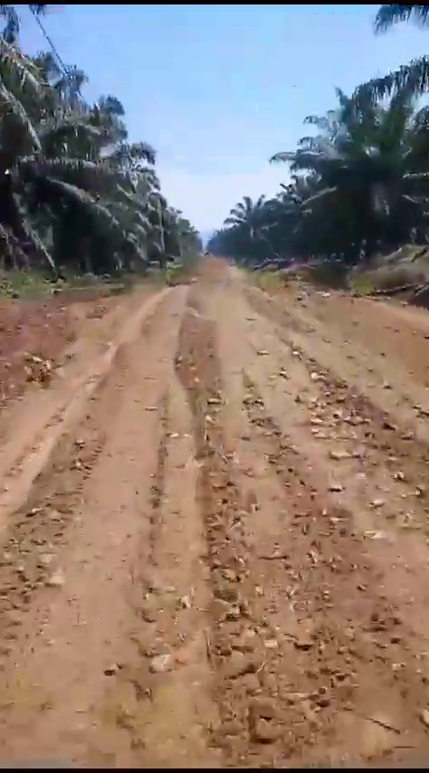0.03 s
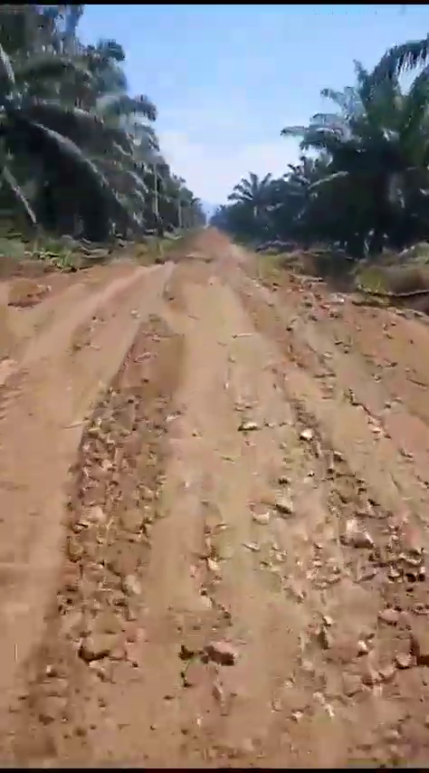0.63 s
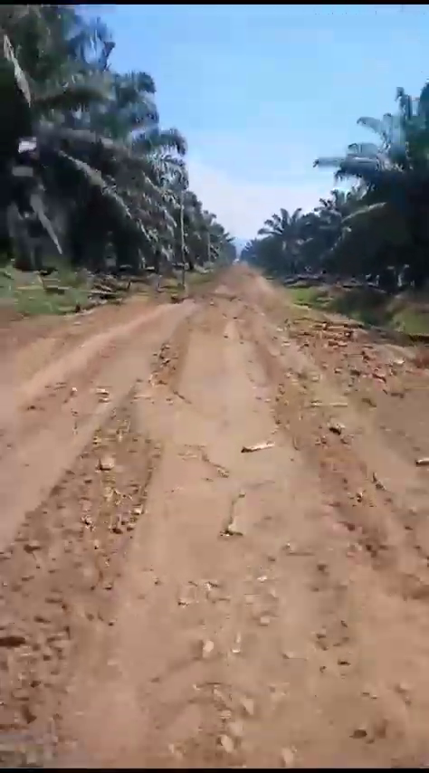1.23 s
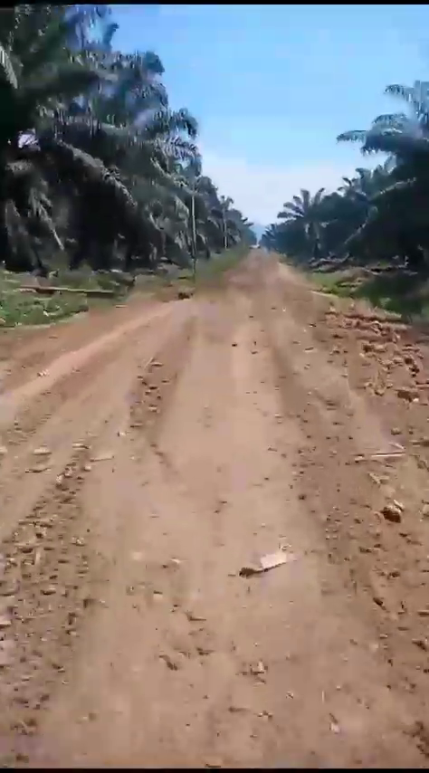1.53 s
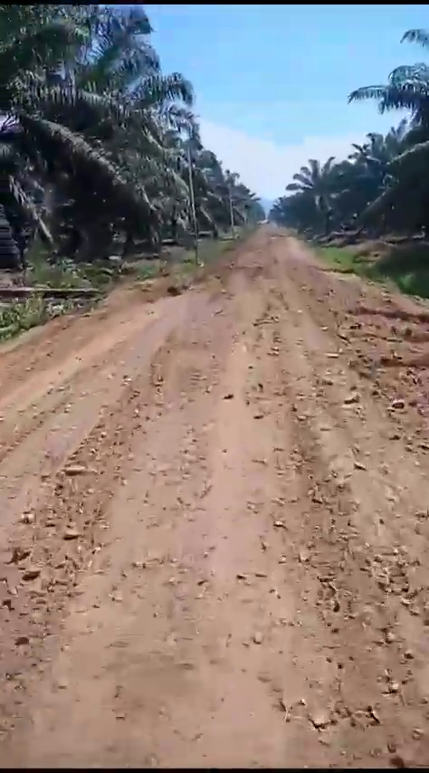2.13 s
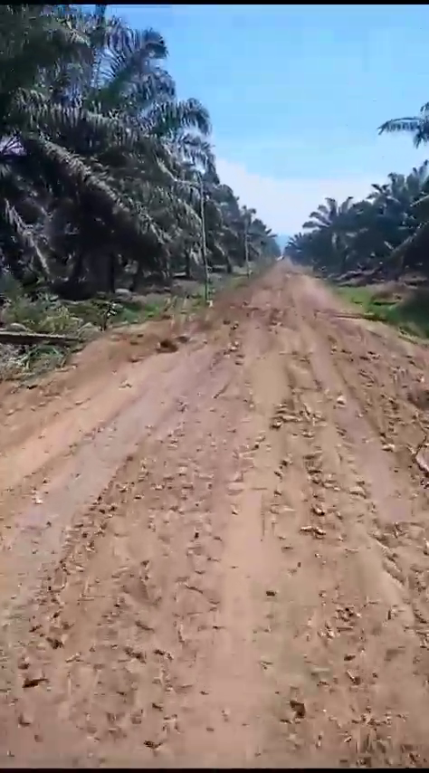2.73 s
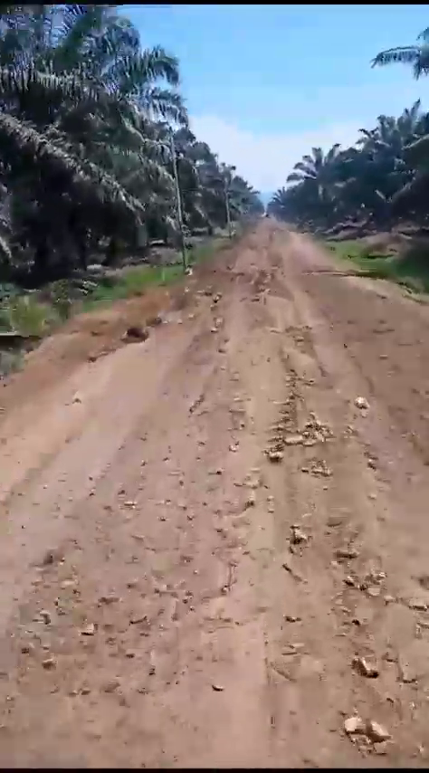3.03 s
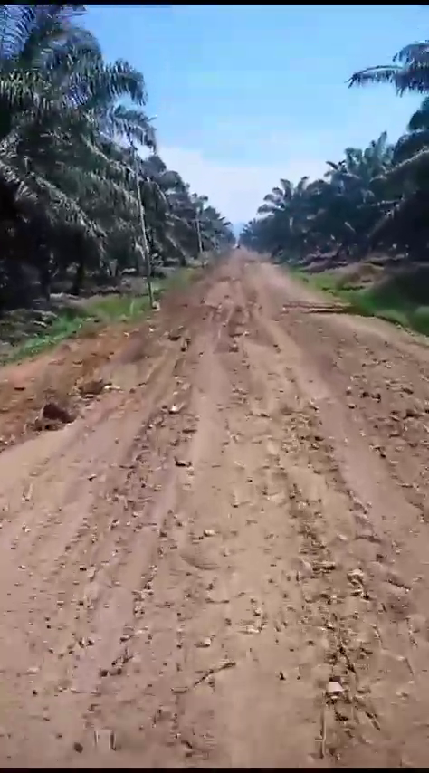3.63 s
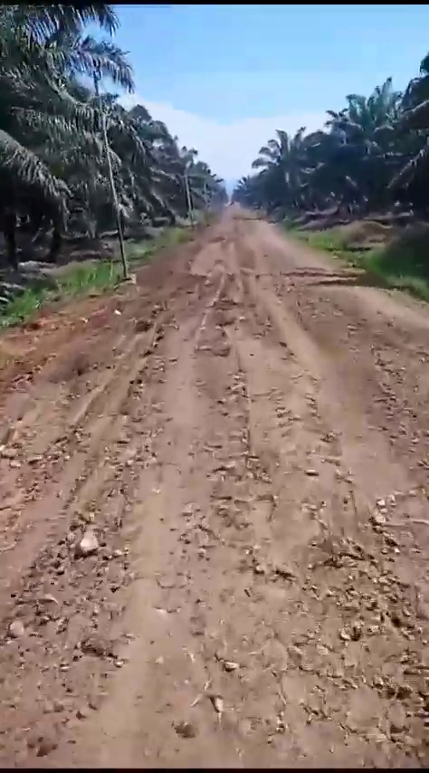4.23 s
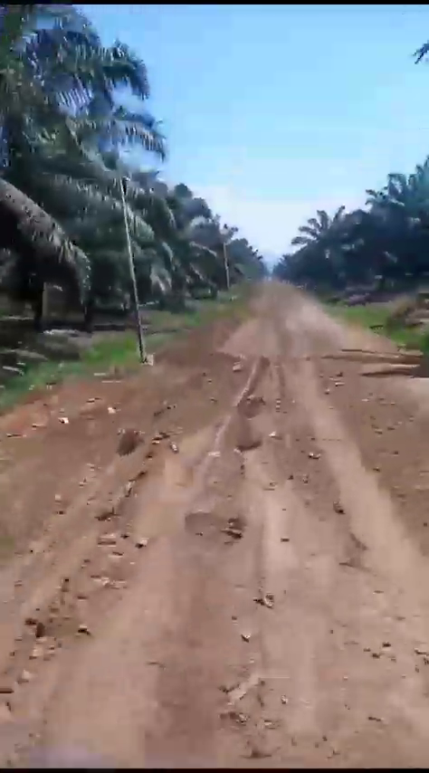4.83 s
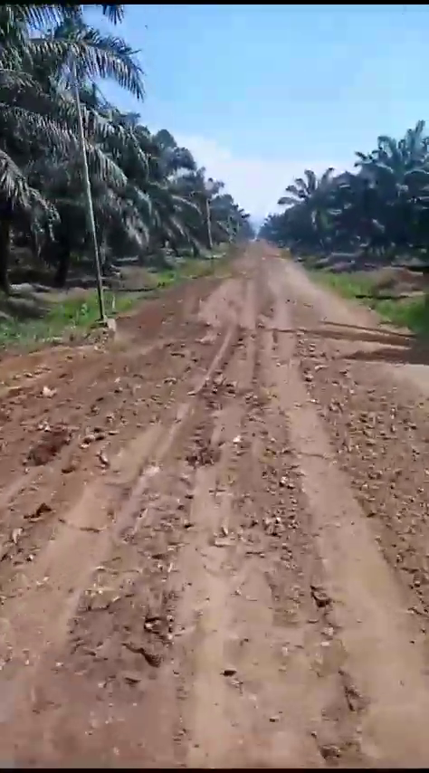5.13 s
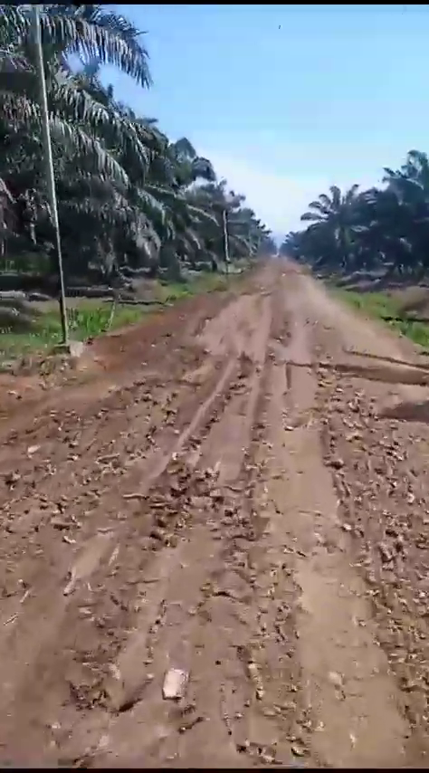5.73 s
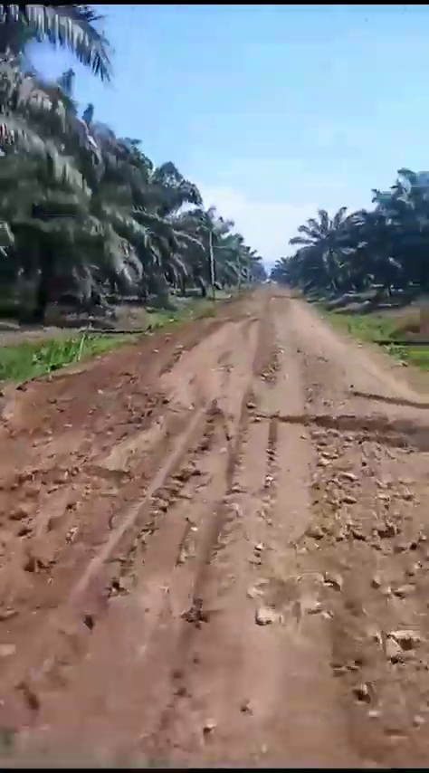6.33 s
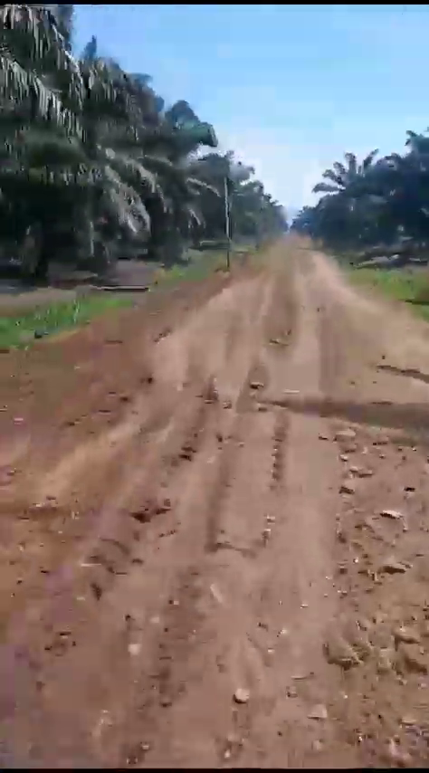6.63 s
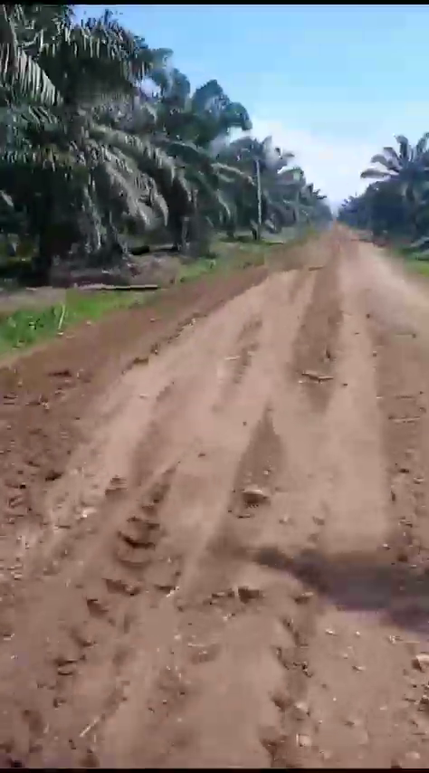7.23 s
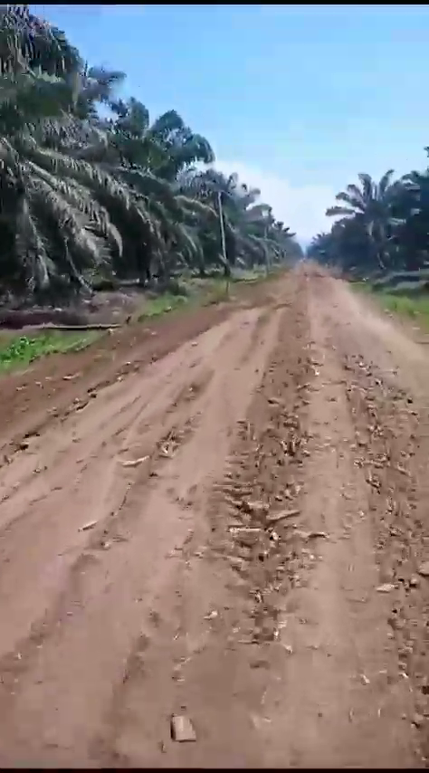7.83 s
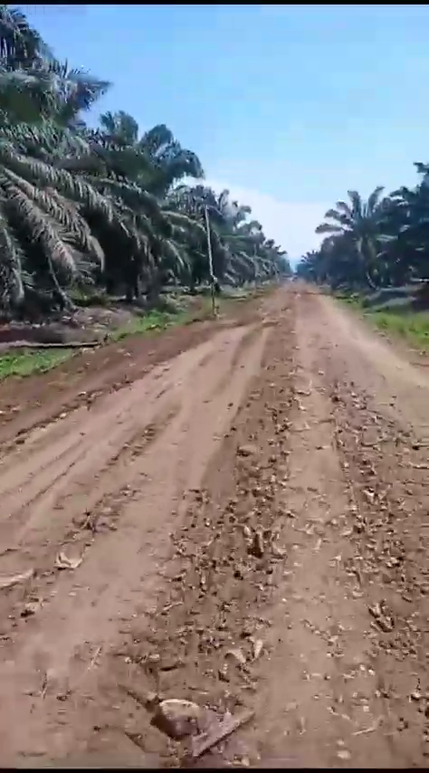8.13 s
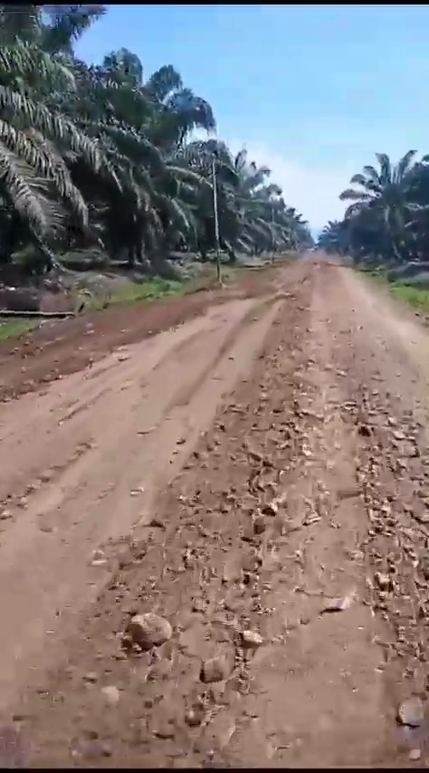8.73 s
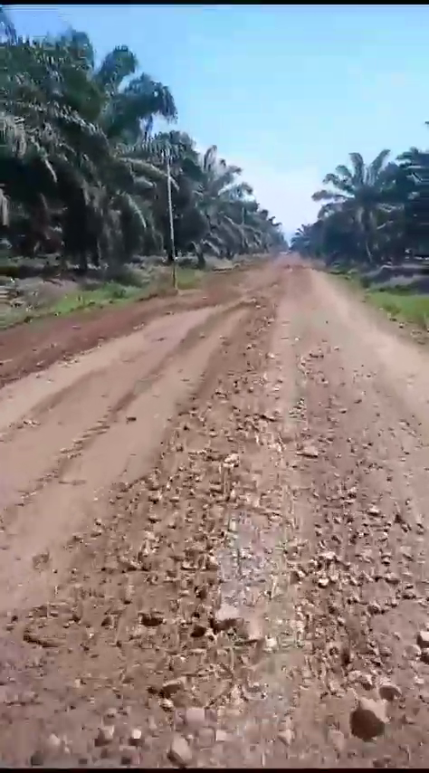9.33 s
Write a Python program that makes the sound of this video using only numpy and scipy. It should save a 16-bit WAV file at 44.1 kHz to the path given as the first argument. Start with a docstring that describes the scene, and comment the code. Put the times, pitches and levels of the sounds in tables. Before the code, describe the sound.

Wind buffets a microphone riding on a small vehicle, likely a motorbike, along a rough dirt road. The engine chugs and ticks close by while the tyres crunch over grit and flick up stones. Ruts twice shake loose panels into rattles and squeaks, the second time with dull thuds. A deep shudder builds, the panels rattle hardest, then the engine speeds up slightly and sharp wind pops hit the microphone.

```python
"""Rough dirt road, open air; the microphone rides on a small single-cylinder vehicle, likely a motorbike.
From the start wind buffets it, over the close chug of the exhaust, ticking valve gear and tyres on grit.
Near 1.3 s and 3 s ruts shake loose panels into rattles and squeaks, the second time with dull thuds.
From about 5 s the frame shudders on rough ground, and around 7 s the panels rattle hardest.
Then the throttle opens, the engine speeds up a little, and after 8 s sharp wind pops hit the microphone."""
import sys
import numpy as np
from scipy import signal
from scipy.fft import rfft, irfft
from scipy.io import wavfile

SR = 44100
rng = np.random.default_rng(int(sys.argv[2]) if len(sys.argv) > 2 else 0)


def master(y):
    """Save y as 16-bit WAV."""
    cut = np.clip(np.atleast_2d(y).T, -1, 1)
    pcm = np.round(cut * 32767)  # scale
    wavfile.write(sys.argv[1], SR, pcm.astype(np.int16))


N = 414540
TIME = np.arange(N) / SR

# Levels are relative. Steady airflow at the microphone: t/s, level/dB
AIRFLOW = [(0, -14.5), (0.5, -15), (1.1, -13), (1.45, -15), (2.5, -17.5), (3.05, -14), (3.95, -14.5),
           (4.55, -16.5), (5.5, -18.5), (5.75, -12.5), (6.5, -15), (8.5, -15), (9.05, -13), (9.4, -16)]
# gusts (+) and lulls (-): t/s, level change/dB, half length/s
GUSTS = [(1.229, -5.5, 0.022), (1.297, 3, 0.013), (1.963, -8, 0.012), (2.15, 3.5, 0.049), (2.643, -3, .03),
         (3.005, 5, 0.026), (3.099, 5.5, .012), (3.215, -4.5, 0.02), (6.09, 5.5, 0.016), (6.732, -9, 0.022),
         (7.353, -6.5, 0.023)]
# sharpest wind pops on the microphone: t/s, level/dB
WIND_POPS = [(8.141, 12.5), (8.183, 12.5), (8.926, 11.5), (9.048, 13.5), (9.105, 12)]
# spectra of the buffeting and of a wind pop: f/Hz, level/dB
BUFFET_SPECTRUM = [(20, -35), (36, -39.5), (50, -17), (62, -15.5), (74, -4.5), (100, -1), (135, 1),
                   (200, -3.5), (340, -7.5), (500, -13.5), (800, -22), (1500, -30), (4000, -52.5),
                   (7000, -87)]
POP_SPECTRUM = [(40, -38.5), (120, 0.5), (300, -0.5), (600, -4), (1200, -25.5), (4000, -39), (14000, -100)]

# engine firing rate: t/s, f/Hz
FIRING_RATE = [(0.0, 24.94), (1.41, 24.2), (2.74, 24.16), (3.37, 23.26), (3.92, 23.16), (4.31, 24.04),
               (5.09, 23.08), (5.36, 24.16), (6.46, 24.33), (8.26, 27.42), (8.97, 26.15), (9.4, 26.45)]
# throttle: t/s, opening/0-1
THROTTLE = [(0, 0.5), (1.5, 0.16), (5.2, 0.15), (5.7, .35), (6.8, 0.3), (7.55, 0.7), (8.7, 0.77),
            (9.4, 0.5)]
# how hard the machine works, heard in engine and tyre noise: t/s, level/dB
LOAD = [(0, -37.5), (0.3, -35.5), (0.75, -38.5), (1.53, -37.5), (2.7, -39.5), (2.97, -36), (3.3, -37.5),
        (3.8, -38.5), (5.3, -37), (5.85, -34.5), (7.7, -35), (9.4, -37.5)]
# low engine hum: order/multiple of the firing rate, level/dB
HUM_ORDERS = [(4, -5), (5, -0.5), (6, -4), (7, -2), (8, -2), (10, -3.5), (14, -3.5)]
# blows in each engine cycle: place/cycles, level/dB, decay/cycles, change at full throttle/dB
ENGINE_BLOWS = [(.01, -2.5, 0.064, -1), (.08, 1.5, 0.098, -1.5), (.22, -6.5, 0.13, 5), (.4, -6, 0.1, 3),
                (0.481, 0, 0.085, -7.5), (0.681, -4.5, 0.15, -0.5), (.81, -12.5, 0.12, 4.5),
                (.94, -2.5, 0.088, -14)]
# spectra of the exhaust bark, metal clatter and valve tick: f/Hz, level/dB
BARK_SPECTRUM = [(200, -21), (350, -1), (550, -8.5), (750, -7.5), (1000, -14), (1500, -19), (3000, -39),
                 (6000, -64)]
CLATTER_SPECTRUM = [(400, -12), (900, -4.5), (1900, 0.5), (2600, -3.5), (3300, -8.5), (4200, -12),
                    (5000, -18), (5700, -32), (7200, -32), (9000, -40), (11200, -41), (12000, -57.5),
                    (14500, -47), (16000, -67)]
TICK_SPECTRUM = [(2500, -6), (4200, 15), (5800, -7), (8500, -9), (11200, -11), (12200, -26), (14300, -19),
                 (16000, -36.5)]
# resonances of the engine case and of the loose panels: f/Hz, width/Hz, level/dB
CASE_MODES = [(884, 24, 2), (1190, 120, -2), (1310, 70, 3), (1496, 53, 3.5), (1778, 70, 3),
              (2070, 200, -2.5), (3090, 78, 1), (3386, 110, 2.5), (4064, 200, -1), (4990, 200, -6),
              (6940, 88, 3.5), (7300, 120, -5.5), (8350, 160, 0), (9000, 110, -1.5), (9400, 80, 3.5)]
PANEL_MODES = [(557, 17, 18), (874, 26, 6), (1130, 16, -1), (1210, 26, 7.5), (1450, 25, 6), (2170, 30, 6.5),
               (2450, 40, -1), (2790, 35, -2), (3040, 45, 3), (4250, 32, -2.5)]

# panels knocking on the frame: t/s, level/dB, decay/s, low cut/Hz
KNOCKS = [(1.325, -20, 0.017, 900), (1.352, -20, 0.043, 500), (1.419, -21.5, 0.025, 700),
          (2.998, -20.5, 0.023, 250), (3.034, -29, 0.0091, 1700), (3.04, -16, 0.0044, 300),
          (6.769, -8.5, 0.019, 383), (6.782, -5, 0.0033, 4000), (6.785, -10.5, 0.012, 300),
          (6.817, -17, .008, 1500), (6.843, -14, 0.013, 1500), (7.074, -6, 0.0097, 6500),
          (7.09, -9, 0.018, 1400), (7.205, -16, 0.021, 450), (7.206, -11, .015, 6500),
          (7.22, -18, 0.005, 1500), (7.336, -20, 0.01, 600)]
# deep shudder from the road: t/s, level/dB
SHUDDER = [(0, -54.5), (4.8, -49.5), (5.35, -36.5), (6.1, -28.5), (6.6, -39), (7.4, -32.5), (8.2, -46),
           (9.4, -40)]
# jolts of the frame in a deep rut: t/s, level/dB
JOLTS = [(2.968, -16.5), (3.006, -18), (3.033, -14)]
# stones flung against the underside: t/s, level/dB
STONES = [(.165, -26), (.28, -24), (1.528, -24), (3.102, -24), (3.144, -19), (4.529, -23), (4.7, -26),
          (4.955, -22), (4.977, -21), (5.529, -20.5), (5.55, -26), (6.352, -21), (9.343, -23.5)]
# patches of loose gravel: t/s, level/dB, half length/s
GRAVEL_PATCHES = [(0.426, -33.5, 0.028), (1.66, -38.5, .035), (2.203, -40, 0.034), (3.462, -34, 0.02),
                  (3.867, -33, 0.021), (4.753, -36.5, 0.071), (6.322, -30.5, 0.021)]
# loose parts rubbing: t/s, level/dB, f/Hz, length/s, pitch fall/share of f
SQUEAKS = [(1.301, -27, 1120, 0.13, .3), (1.363, -31.5, 3650, 0.028, .01), (2.982, -22, 985, 0.062, 0.11),
           (3.019, -32, 3260, 0.031, .01), (3.162, -67, 9550, .06, .035), (4.135, -60, 9200, 0.051, .035)]
# spectra of tyre grit, a struck panel, a frame thud and a stone hit: f/Hz, level/dB
GRIT_SPECTRUM = [(300, -14.5), (800, 4.5), (1400, -1.5), (2200, -3.5), (3300, -6.5), (4800, -28.5),
                 (5800, -27), (7200, -42), (10000, -51.5), (15500, -62.5)]
PANEL_SPECTRUM = [(200, -28), (550, 9.5), (1200, 8.5), (2400, 1), (3400, -0.5), (4800, -15), (6000, -26.5),
                  (9000, -36.5), (15000, -47)]
THUD_SPECTRUM = [(50, -27), (140, 3), (300, 6), (600, -13), (1300, -16), (2500, -22), (6000, -65)]
STONE_SPECTRUM = [(400, -16.5), (1000, 4), (2100, 9.5), (3500, -2.5), (5000, -11.5), (5900, -24),
                  (9000, -36.5), (15000, -46.5)]


def wind(level_db=-1, eddy_db=3.5, pop_db=-11):
    """Turbulence pushes right on the microphone; small eddies come in bursts, the sharpest as pops."""
    flow = colour(rng.standard_normal(N), BUFFET_SPECTRUM)
    deep = cut(flow, 260, "low")
    eddies = cut(flow, 260, "high") * unit(amp(eddy_db * drift(41)))
    small_pops = unit(colour(grains(110, 1.9), POP_SPECTRUM))
    sharp_pops = np.zeros(N)
    for s, db in WIND_POPS:
        add(sharp_pops, s, amp([db]))
    buffet = unit(deep - eddies) + amp(pop_db) * small_pops
    return amp(airflow_db() + level_db) * buffet - colour(sharp_pops, POP_SPECTRUM)


def airflow_db(flutter_db=0.74, flutter_hz=15):
    """Wind level at the microphone: steady flow, short gusts and lulls, and a random flutter."""
    gusts = sum(db * np.exp(-.5 * ((TIME - s) / half) ** 2) for s, db, half in GUSTS)
    return curve(AIRFLOW) + gusts + flutter_db * drift(flutter_hz)


def exhaust(turns, hum_db=-24, bark_db=5, intake_db=6.5, throttle_db=2.0):
    """Close by, each firing puffs down the pipe over a low hum; the intake growls under throttle."""
    throttle = curve(THROTTLE)
    hum = 0
    for order, db in HUM_ORDERS:
        gain = amp(db + 4.1 * drift(2.6))
        phase = 2 * np.pi * (round(order) * turns + rng.random()) + 0.24 * drift(10)
        hum += gain * np.cos(phase)
    puff = .5 + 1.2 * swell(turns, place=.68 - .1 * throttle, length=.06)
    pipe_modes = [(354, 17, -4), (743, 56, -3), (886, 41, 6.5)]
    bark = colour(puff * rng.standard_normal(N), BARK_SPECTRUM, pipe_modes)
    bark = amp(bark_db + throttle_db * throttle) * unit(bark)
    gulp = swell(turns, place=.84, length=.07) + .7 * swell(turns, place=.18, length=.07)
    intake_spectrum = [(250, -12.5), (450, 2), (760, -4), (1100, -19), (3000, -59.5)]
    growl = colour(gulp * rng.standard_normal(N), intake_spectrum, modes=[(334, 15, 2), (882, 32, 6.2)])
    growl = amp(intake_db) * throttle * unit(growl)
    return amp(hum_db) * unit(hum) + amp(curve(LOAD)) * (bark + growl)


def valve_gear(turns, clatter_db=1.5, tick_db=-26, throttle_db=16, sliding_power=0.0084, click_db=16):
    """Tappets, piston and chain strike the case in each cycle; slack parts quieten under throttle."""
    throttle = curve(THROTTLE)
    blow_power = sum((amp(db + change_db * throttle) * strike(turns, place, decay)) ** 2
                     for place, db, decay, change_db in ENGINE_BLOWS)
    rattle = np.sqrt(sliding_power + blow_power) * rng.standard_normal(N)
    clatter = amp(clatter_db) * unit(colour(rattle, CLATTER_SPECTRUM, CASE_MODES))
    # the hardest blow carries a thin, bright tick, later and louder with the throttle open
    tap = swell(turns, place=.09 + .035 * throttle, length=.07, uneven_db=1)
    tap += .8 * strike(turns, place=.03, decay=.17, uneven_db=1, rise=.008)
    cycle = np.floor(turns - .11)
    click = np.diff(cycle, append=cycle[-1])  # one impulse a cycle
    tick = colour(tap * rng.standard_normal(N) + amp(click_db) * click, TICK_SPECTRUM, CASE_MODES)
    return amp(curve(LOAD)) * (clatter + amp(tick_db + throttle_db * throttle) * unit(tick))


def tyres(level_db=-1.2, patchy_db=2.0):
    """Below the microphone, dirt hisses under the tread and small stones crack out of it in patches."""
    grit = amp(-6) * unit(grains(500, 2.5))
    crunch = unit(colour(rng.standard_normal(N) + grit, GRIT_SPECTRUM))
    return amp(curve(LOAD) + level_db + patchy_db * drift(15)) * crunch


def panels(rise_share=0.17, slam_db=10, settle_db=-36, settle_s=0.065, settle_hz=3000):
    """Ruts throw loose panels at the frame: a dying flurry with one slam, then a thin settling rattle."""
    blows, t = np.zeros(N), TIME[:SR // 2]
    chatter, loose = unit(grains(4000, 3.8)), unit(grains(700, 2.5))
    for s, db, decay, low_cut_hz in KNOCKS:
        rise = rise_share * decay
        flurry = chatter[round(s * SR):][:len(t)] * (1 - np.exp(-t / rise)) * np.exp(-t / decay)
        add(flurry, 2 * rise, amp([slam_db]))
        add(blows, s, amp(db) * cut(flurry, low_cut_hz, "high", order=3))
        settling = loose[round(s * SR):][:len(t)] * np.exp(-t / settle_s)
        add(blows, s, amp(settle_db) * cut(settling, settle_hz, "high"))
    return colour(blows, PANEL_SPECTRUM, PANEL_MODES)


def shudder():
    """Rough ground shakes the frame into a deep rumble."""
    spectrum = [(20, -24.5), (36, -18.5), (50, -3), (72, 2.5), (110, -16), (400, -70.5)]
    return amp(curve(SHUDDER)) * unit(colour(rng.standard_normal(N), spectrum))


def jolts(rise_s=0.0053):
    """The wheels drop into a rut and the frame answers with heavy, dull thuds."""
    thuds, t = np.zeros(N), TIME[:SR // 5]
    envelope = t / rise_s * np.exp(1 - t / rise_s)
    for s, db in JOLTS:
        add(thuds, s, amp(db) * rng.standard_normal(len(t)) * envelope)
    return colour(thuds, THUD_SPECTRUM)


def stones(decay_s=0.0021):
    """Each flung stone hits the underside with one dry, sharp tick."""
    ticks, t = np.zeros(N), TIME[:SR // 50]
    for s, db in STONES:
        add(ticks, s, amp(db) * rng.standard_normal(len(t)) * np.exp(-t / decay_s))
    return colour(ticks, STONE_SPECTRUM)


def gravel(per_s=420, spread_db=5.0, decay_s=0.0012):
    """On loose patches the tread throws a short spray of gravel against the underside."""
    power = sum(amp(db) ** 2 * np.exp(-((TIME - s) / half) ** 2) for s, db, half in GRAVEL_PATCHES)
    hits, t = grains(per_s, spread_db), TIME[:SR // 100]
    tick = rng.standard_normal(len(t)) * np.exp(-t / decay_s)
    spray = unit(signal.oaconvolve(hits, tick)[:N]) + .5 * rng.standard_normal(N)
    return np.sqrt(power) * unit(colour(spray, STONE_SPECTRUM))


def squeaks(scratch_db=-5):
    """Loose parts rub as the frame twists: short, scratchy squeaks that fall in pitch."""
    out = np.zeros(N)
    grip = unit(1 + amp(scratch_db) * drift(160))
    for s, db, hz, length, fall in SQUEAKS:
        t = TIME[:round(length * SR)]
        pitch = hz * (1 - fall * (t / length - .5))
        tone = np.sin(2 * np.pi * np.cumsum(pitch) / SR) * grip[round(s * SR):][:len(t)]
        add(out, s, amp(db) * np.hanning(len(t)) * tone)
    return out


def swell(turns, place, length, uneven_db=2):
    """A smooth rush at one place in every engine cycle; place and length are in cycles."""
    since = turns - place + .5
    return cycle_strength(since, uneven_db) * np.exp(-.5 * ((since % 1 - .5) / length) ** 2)


def strike(turns, place, decay, uneven_db=2, rise=0.011):
    """A quick blow that rings out in every engine cycle; place, decay and rise are in cycles."""
    since = turns - place
    age = since % 1
    return cycle_strength(since, uneven_db) * (1 - np.exp(-age / rise)) * np.exp(-age / decay)


def cycle_strength(since, uneven_db):
    """A random gain for each engine cycle: no two are equally strong."""
    cycle = np.floor(since - np.floor(since[0])).astype(int)
    chance = unit(rng.uniform(-1, 1, SR))
    return amp(uneven_db * chance)[cycle]


def grains(per_s, spread_db):
    """Random clicks, mostly small, a few large."""
    size = amp(spread_db * np.minimum(rng.exponential(1, N), 3)) * rng.choice([-1, 1], N)
    return size * (rng.random(N) < per_s / SR)


def drift(hz):
    """Random wander of rms 1, up to about this rate, with its extremes softened."""
    f = np.fft.rfftfreq(N, 1 / SR)
    slow = irfft(rfft(rng.standard_normal(N)) / (1 + (f / hz) ** 4), N)
    return unit(np.tanh(.5 * unit(slow)))


def colour(x, spectrum, modes=(), size=8192):
    """Causal filter: a smooth spectrum (f/Hz, level/dB) with resonances (f/Hz, width/Hz, level/dB)."""
    f = np.fft.rfftfreq(size, 1 / SR)
    hz, db = np.transpose(spectrum)
    gain = amp(np.interp(np.log(f + 1), np.log(hz), db))
    gain *= 1 + sum(amp(peak) / (1 + (2 * (f - centre) / width) ** 2) for centre, width, peak in modes)
    cepstrum = irfft(np.log(gain))
    cepstrum[1:size // 2] *= 2  # fold to minimum phase
    cepstrum[size // 2 + 1:] = 0
    ring = irfft(np.exp(rfft(cepstrum)))[:size // 2]
    return signal.oaconvolve(x, ring / np.linalg.norm(ring))[:len(x)]


def cut(x, hz, kind, order=2):
    """High-pass or low-pass."""
    return signal.sosfilt(signal.butter(order, min(hz, .45 * SR), kind, fs=SR, output="sos"), x)


def amp(db):
    """Decibels to gain."""
    return 10 ** (np.asarray(db) / 20)


def unit(x):
    """Scales to rms 1."""
    return x / np.sqrt(np.mean(x ** 2) + 1e-20)


def curve(rows):
    """A table's points, joined by straight lines in time."""
    return np.interp(TIME, *np.transpose(rows))


def add(mix, s, sound):
    """Mixes a sound in at s seconds."""
    part = mix[max(round(s * SR), 0):][:len(sound)]
    part += sound[:len(part)]


def scene():
    """One microphone in open air, riding along: every source stays at the same close distance."""
    turns = np.cumsum(curve(FIRING_RATE)) / SR  # engine cycles elapsed
    mix = wind() + shudder() + exhaust(turns) + valve_gear(turns)
    mix += tyres() + gravel() + stones() + jolts() + panels() + squeaks()
    return mix[None]


def record(dry, ceiling=.95, fade_s=.008, edge_hz=15700):
    """The loudest gusts are rounded off, the ends fade briefly and the top treble is cut."""
    rounded = dry / (1 + (dry / ceiling) ** 6) ** (1 / 6)
    fades = np.minimum(np.minimum(TIME, TIME[::-1]) / fade_s, 1)
    low_pass = signal.firwin(511, edge_hz, window=("kaiser", 9), fs=SR)
    return signal.oaconvolve(fades * rounded, low_pass[None], "same")


dry = scene()
out = record(dry)
master(out)
```